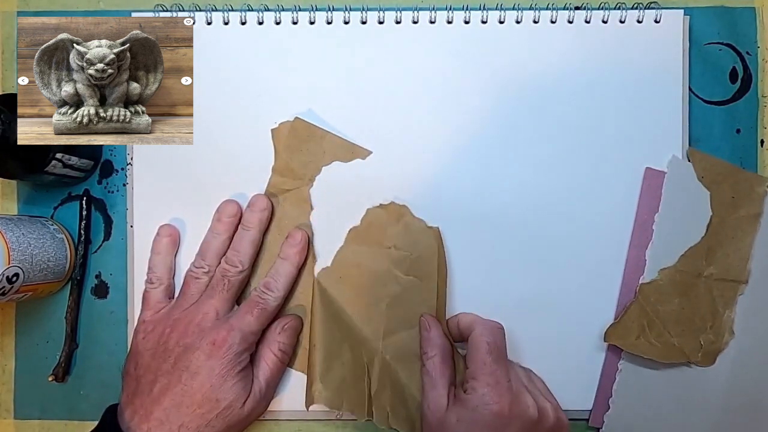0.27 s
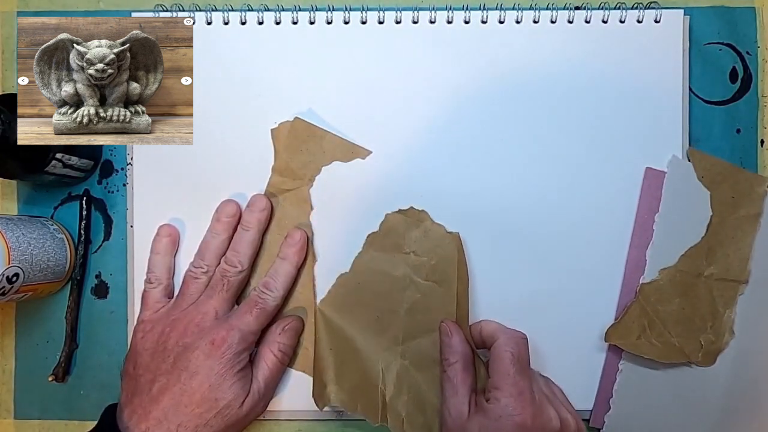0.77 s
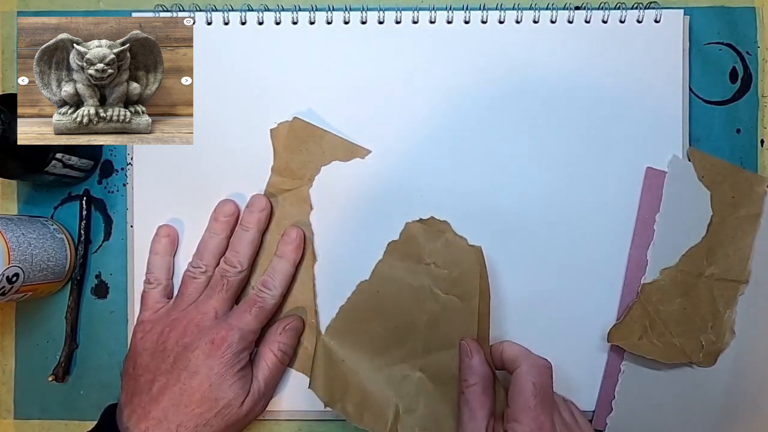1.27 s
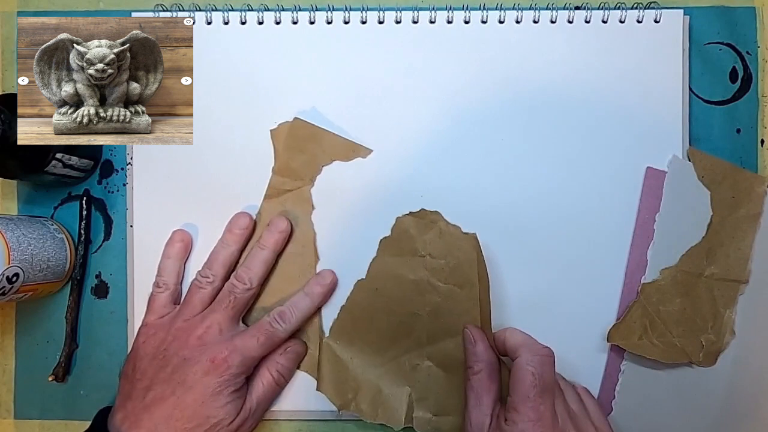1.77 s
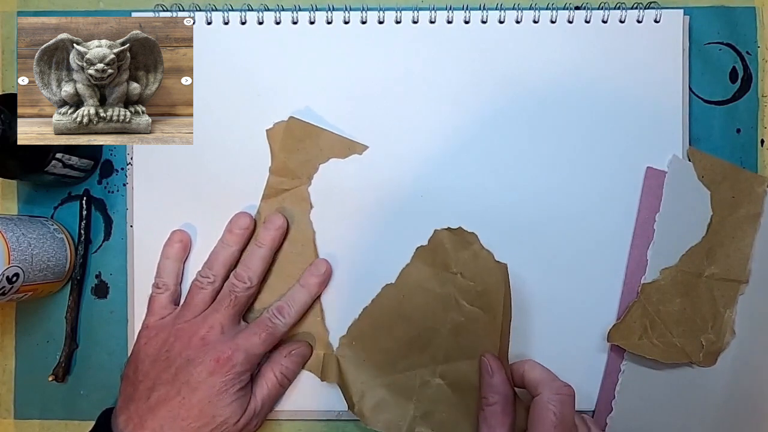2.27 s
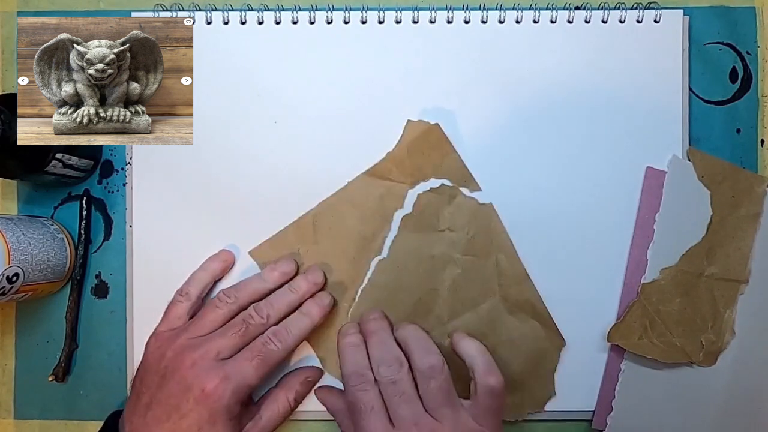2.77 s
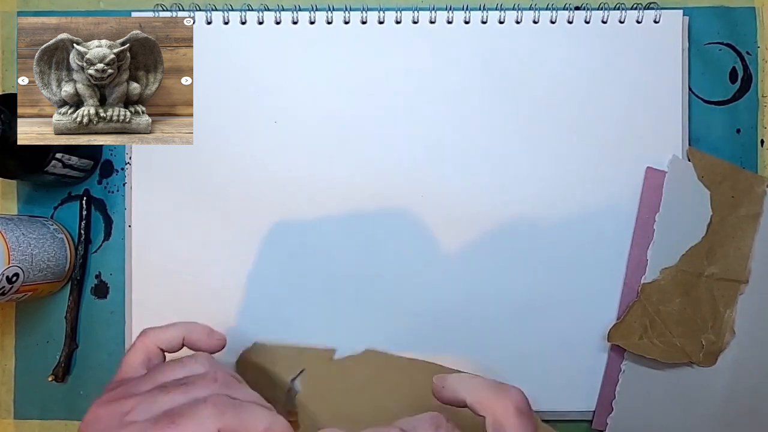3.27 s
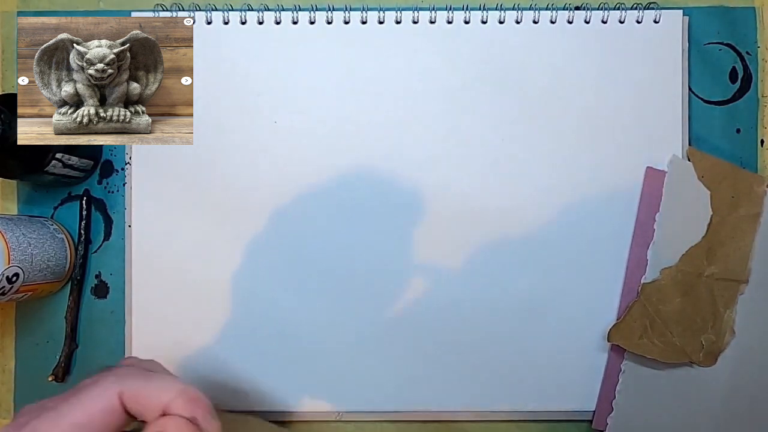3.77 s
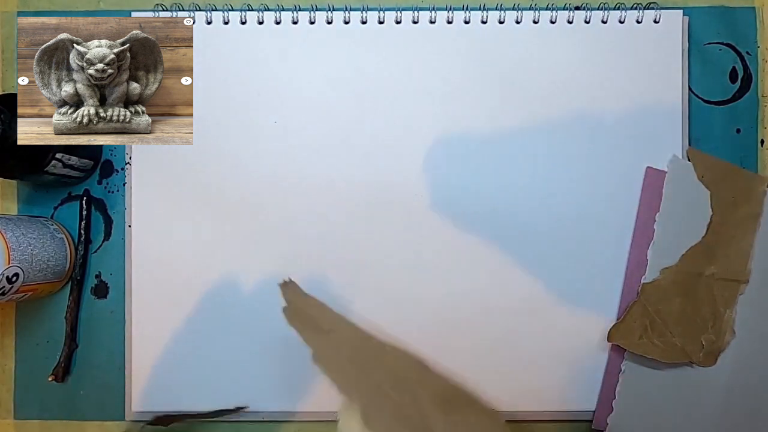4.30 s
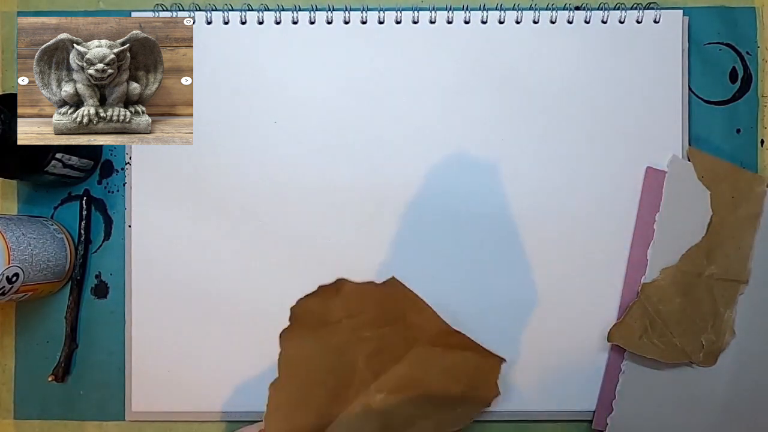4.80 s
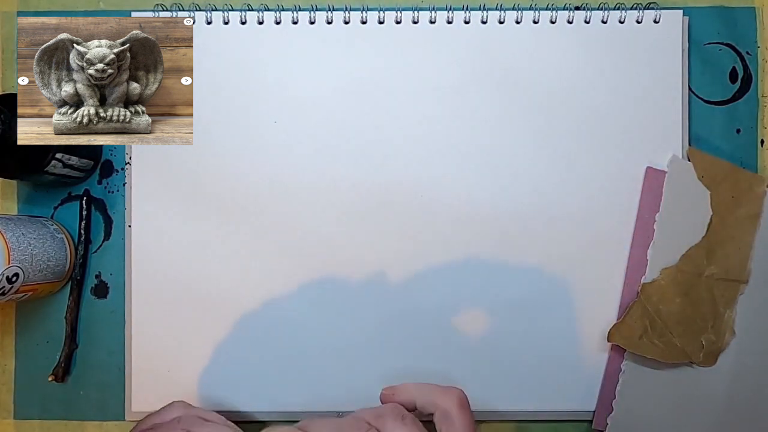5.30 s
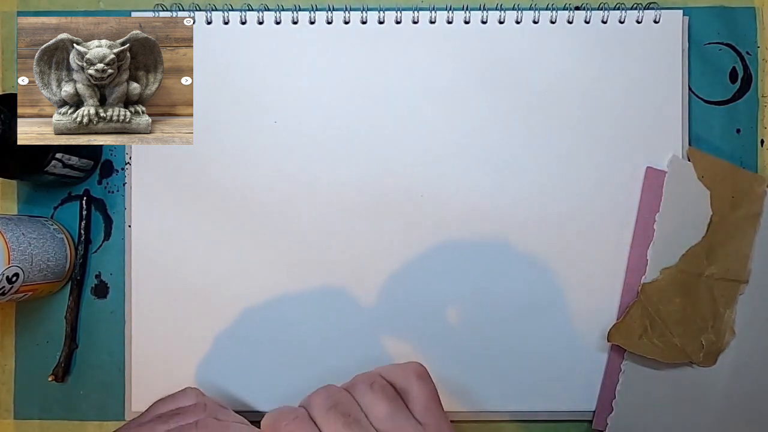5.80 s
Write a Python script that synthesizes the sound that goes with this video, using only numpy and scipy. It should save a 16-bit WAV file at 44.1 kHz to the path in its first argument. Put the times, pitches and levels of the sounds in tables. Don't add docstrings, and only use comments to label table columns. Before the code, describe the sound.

A close microphone in a small, fairly dry room picks up stiff brown paper handled on a worktable. From 0 to about 1.3 seconds it is torn in short irregular pulls, a gritty fizz of breaking fibres with bright snaps, strongest near 0.6 and 1.18. Smaller crease pops follow at 1.4 and around 1.9 to 2.1, then a near lull. Soft sliding swells at 2.5, with a crisp little crackle at 2.8. Between 3.05 and 3.35 the sheet gathers and crinkles, with dull finger taps. A hard, dense crumple bursts at 3.65 to 3.8, then fades into light rustling. A very sharp crack lands at 4.72, another bright pair at 4.87. Faint crinkles and a tap come near 5.13, quiet rubbing follows, and a final crisp crumple at 5.9. Low building rumble and faint hiss lie beneath, with soft table bumps.

```python
import sys
import numpy as np
from scipy import signal
from scipy.fft import rfft, irfft
from scipy.io import wavfile
from scipy.ndimage import uniform_filter1d

SR = 44100
rng = np.random.default_rng(int(sys.argv[2]) if len(sys.argv) > 2 else 0)


def to_linear_factor(level_db):
    exponent = np.asarray(level_db, float) / 20
    return 10 ** exponent


def bounce(signal):
    frames = np.transpose(np.atleast_2d(signal))
    limited = np.clip(frames, -1, 1)
    pcm = np.round(limited * 32767).astype(np.int16)
    wavfile.write(sys.argv[1], SR, pcm)


N = 266805


def evened(x):
    return x / np.sqrt(np.mean(x ** 2, axis=-1, keepdims=True) + 1e-20)


def read(points, hz):
    f, value = np.transpose(points)
    return np.interp(np.log(hz + 1), np.log(f + 1), value)


def causal(gain, size=2048):
    mirrored = np.r_[gain, gain[-2:0:-1]]
    log_gain = np.log(np.maximum(mirrored, 1e-5))
    return np.fft.ifft(np.exp(np.conj(signal.hilbert(log_gain)))).real[:size]


BAND_EDGES = (2000, 4300, 7600)
# f/Hz, level/dB
PAPER_COLOUR = [(90, -38.5), (200, -16), (500, -11), (1200, -11), (3000, -7.5), (4400, -6), (5500, -8),
                (6600, -8.5), (8500, -16.5), (12000, -32), (16000, -45.5)]


def paper_bands():
    hz = np.fft.rfftfreq(4096, 1 / SR)
    lowpasses = [1 / (1 + (hz / edge) ** 6) for edge in BAND_EDGES]
    shares = np.abs(np.diff([0 * hz] + lowpasses + [1 + 0 * hz], axis=0))
    colour = to_linear_factor(read(PAPER_COLOUR, hz))
    bands = np.array([causal(colour * np.sqrt(share)) for share in shares])
    return bands / np.linalg.norm(bands, axis=1, keepdims=True)


# t/s, hold/s, fizz level/dB, flex level above fizz/dB
SHARP_PULLS = [(0.0, 0.09497, -50, -8.5), (0.12, 0.084, -48, -12), (0.319, 0.12, -46.5, -8.5),
               (0.582, 0.055, -47, -7), (0.66, 0.092, -51.5, -5), (0.965, 0.11, -41.5, -8.5),
               (1.188, 0.088, -46, -8), (1.35, 0.025, -55, -10.5), (1.413, 0.02738, -51, -11),
               (1.55, 0.16, -61, -9.5), (1.872, 0.1309, -50, -10), (2.12, 0.025, -63, -14),
               (2.26, 0.11, -64, -12), (2.703, 0.064, -60, -16), (5.823, 0.023, -52.5, -6),
               (2.591, 0.0145, -59, -3), (3.483, 0.0081, -44, -10), (3.973, 0.00607, -52.5, -6),
               (4.271, 0.05208, -57, -13.5), (4.674, 0.042, -48, -7.5), (4.727, 0.01523, -41, -6.5),
               (4.869, 0.0089, -44.5, -10), (5.668, 0.043, -58.5, -7.5)]
PULL_RISE_S, PULL_FALL_S = 0.015, 0.064
PULL_BODY_DB, PULL_AIR_DB = -5.5, -5.5
# peak t/s, fizz level/dB, rise/s and fall/s for 20 dB, flex level above fizz/dB
SOFT_RUBS = [(0.55, -52.5, 0.051, 0.2759, -8.5), (1.1, -45, 0.0439, 0.12, -7),
             (1.746, -63, 0.101, 0.3447, -5.5), (2.4, -54.5, 0.17, 0.4, -11.5),
             (2.49, -47.5, 0.15, 0.13, -15), (2.815, -47.5, 0.11, 0.2, -9.5), (2.87, -64, 0.07, 1.5, -2),
             (2.99, -51, 0.16, 0.4, -18), (3.8, -46, 0.058, 0.17, -17.5), (3.91, -53, 0.12, 0.06, -17),
             (4.049, -60, 0.075, 0.2, -9), (4.145, -50, 0.06195, 0.08, -27.5),
             (4.39, -51.5, 0.15, 0.07, -17), (4.522, -58.5, 0.218, 0.3, -9.5), (4.84, -51, 0.2, 0.31, -8.5),
             (5.139, -53.5, 0.0498, 0.1176, -1.5), (5.33, -57.5, 0.14, 0.13, -3),
             (5.384, -54, 0.036, 0.1175, -17.5), (5.447, -56.5, 0.0418, 0.1473, -15),
             (5.6, -64.5, 0.11, 0.5, -25), (5.79, -60.5, 0.2226, 0.6, -5.5),
             (5.85, -47.5, 0.03, 0.1894, -10), (1.845, -63.5, 0.05, 0.25, 2.5)]
RUB_BODY_DB, RUB_AIR_DB = -8.5, -8
# full t/s, hold/s, fizz level/dB, rise/s for 20 dB (sign ignored),
# flex level above fizz/dB
AIR_SWELLS = [
    (3.07, 0.27, -48.5, -0.05, -10.5),
    (3.683, 0.081, -32, 0.09, -21),
    (4.941, 0.13, -54.5, 0.08, -19),
    (5.091, 0.17, -54.5, -0.3, -22.5),
    (5.896, 0.051, -36.5, 0.0033, -12),
]
SWELL_FALL_S, SWELL_BODY_DB, SWELL_AIR_DB = 0.038, -5, -7
REST_DB = -80.5
# t/s, level/dB
AIR_DRIFT = [(0, 0), (1.3, 2.5), (1.6, 2), (2.3, 6.5), (2.55, -2), (3.5, 1), (4.6, -0.5), (4.95, 0),
             (5.75, -4.5), (5.9, 5.5)]


def effort():
    t = np.arange(0, N / SR, 1 / 1000)
    strokes = [(s, hold, db, PULL_RISE_S, PULL_FALL_S, flex, PULL_BODY_DB, PULL_AIR_DB)
               for s, hold, db, flex in SHARP_PULLS]
    strokes += [(s, 0, db, rise, fall, flex, RUB_BODY_DB, RUB_AIR_DB)
                for s, db, rise, fall, flex in SOFT_RUBS]
    strokes += [(s, hold, db, rise, SWELL_FALL_S, flex, SWELL_BODY_DB, SWELL_AIR_DB)
                for s, hold, db, rise, flex in AIR_SWELLS]
    power = to_linear_factor(2 * (REST_DB + np.array([[-8], [RUB_BODY_DB], [0], [-6]]))) + 0 * t
    for s, hold, db, rise, fall, flex, body, air in strokes:
        rising_db = -20 * np.maximum(s - t, 0) / abs(rise)
        falling_db = -20 * np.maximum(t - s - abs(hold), 0) / abs(fall)
        level = db + rising_db + falling_db
        power += to_linear_factor(2 * (level + np.array([[flex], [body], [0], [air]])))
    power[-1] *= to_linear_factor(2 * np.interp(t, *np.transpose(AIR_DRIFT)))
    return t, 10 * np.log10(power)


def clicks(per_s, spread_db):
    breaks = rng.random(N) < per_s / SR
    size = to_linear_factor(spread_db * np.minimum(rng.exponential(1, N), 4)) * breaks
    spread = signal.lfilter([1], [1, -.9], size)
    return evened(spread * rng.standard_normal(N))


WHISPER_HZ, WHISPER_WIDTH_HZ, WHISPER_DB = 5350, 1000, -15


def rustle(bands, s, levels, tear_db=0.0, slide_db=-0.86, patchy_db=2.5, own=0.69):
    t = np.arange(N) / SR
    fizz_db = np.interp(t, s, levels[2])
    pull = np.clip((fizz_db + 56) / 12, 0, 1)
    lumps = uniform_filter1d(rng.standard_normal(N), size=120)
    lumps = evened(uniform_filter1d(lumps, size=120))
    clumps = to_linear_factor((slide_db + (tear_db - slide_db) * pull) * np.clip(lumps, -3, 2))
    shared, out = clicks(2000, 1.6), np.zeros(N)
    for band, db in zip(bands, levels):
        drive = evened(clumps * (shared + own * clicks(3000, 1.0)))
        out += signal.oaconvolve(drive * to_linear_factor(np.interp(t, s, db)), band)[:N]
    whisper = signal.filtfilt(*signal.iirpeak(WHISPER_HZ, WHISPER_HZ / WHISPER_WIDTH_HZ, fs=SR), drive)
    out += evened(whisper) * (1 - pull) * to_linear_factor(WHISPER_DB + fizz_db)
    z = signal.stft(out, nperseg=256)[2]
    patches = uniform_filter1d(rng.standard_normal(z.shape), size=4, axis=0)
    patches = uniform_filter1d(patches, size=4, axis=1)
    patch_gain = to_linear_factor(patchy_db * (patches / patches.std() - patchy_db / 9))
    return signal.istft(z * patch_gain, nperseg=256)[1][:N]


SLIPS_PER_S = 12
SLIP_DB, SLIP_SPREAD_DB, SLIP_FLEX_DB = -3, 8, -21.5


def slips(s, levels):
    when, size, bend = rng.random((round(SLIPS_PER_S * s[-1]), 3)).T
    when = when * s[-1]
    fizz_db = np.interp(when, s, levels[2]) + SLIP_DB - SLIP_SPREAD_DB * size
    return list(zip(when, fizz_db, SLIP_FLEX_DB + 16 * (bend - .5)))


# t/s, fizz
# level/dB, flex level above fizz/dB
FIBRE_SNAPS = [(0.025, -38.5, -17), (0.0551, -35, -18), (0.1185, -38, -14), (0.1286, -37, -12),
               (0.161, -38, -6), (0.213, -47, -5.5), (0.309, -34.5, -16), (0.3281, -33.5, -14.5),
               (0.353, -35, -14), (0.38, -35, -6.5), (0.3955, -35.5, -12), (0.432, -34, -9.5),
               (0.5409, -43.5, -10), (0.5721, -39, -7), (0.5902, -30, -8.5), (0.6224, -36, -7),
               (0.688, -38.5, -6), (0.7514, -41.5, -3), (0.7892, -48.5, 5), (0.9238, -48, -11.5),
               (0.9519, -38.5, -24), (1.0027, -38.5, -12), (1.0589, -39.5, -2), (1.112, -36.5, -10),
               (1.1385, -33, -12.5), (1.1764, -28.5, -7), (1.206, -42, -17), (1.2254, -38, -21),
               (1.246, -41, -19), (1.268, -44, -17),
               (0.075, -41, -19), (0.15, -39, -9), (0.1788, -42.5, -8), (0.2814, -54.5, -13.5),
               (0.3344, -35, -14), (0.4178, -40.5, -11), (0.489, -51.5, -20), (0.58, -38, -12),
               (0.734, -48, -13), (0.9181, -56, -16.5), (0.9582, -34, -5.5), (1.088, -56, -16),
               (1.171, -49, -16), (1.746, -53, -9.5), (1.897, -39.5, -11), (1.942, -39, -11),
               (2.9562, -52, -23.5), (3.5776, -47.5, -10), (2.249, -61.5, -24.5), (4.814, -52, -6),
               (5.199, -48, -12), (5.829, -53, -19.5), (5.8548, -54.5, -14), (5.878, -43, -25)]
# t/s, fizz level/dB, flex
# and body level above fizz/dB
CREASE_SNAPS = [(1.349, -48.5, -4.5, -1), (1.4177, -41, -8.5, 1.5), (1.4424, -46, -34.5, -8.5),
                (1.7286, -48.5, -7.5, -6.5), (1.751, -45.5, -6.5, -5), (1.873, -39, -6.5, -5.5),
                (1.9191, -34, -10.5, -6.5), (1.981, -48, -34.5, -9), (2.0088, -44, -15, -6),
                (2.1123, -45, -17, -6), (2.131, -53, -30, -17.5), (2.2762, -53.5, 3, 5),
                (2.489, -55, -41.5, -13.5), (2.514, -52, -30.5, -1), (2.5837, -55, -7, 6.5),
                (2.595, -36.5, -46, -10), (2.808, -41.5, -10, -18), (2.783, -49, -8, -11),
                (2.851, -45, -2, -4), (2.945, -49.5, -5, -3.5), (2.991, -59, -19.5, -4),
                (3.1257, -49.5, 6, -14), (3.1415, -35, -7, 3), (3.1955, -54.5, 5.5, 9.5),
                (3.2481, -41, -9, -18.5), (3.2865, -31.5, -12.5, 1), (3.3271, -59, -25, -11.5),
                (3.4817, -36.5, -31.5, -10), (3.603, -50, 0, -25),
                (3.6463, -44, -45, -10), (3.669, -39, -21, -15.5), (3.7494, -39.5, -8, 8),
              (3.7709, -40, -4, 7), (3.8297, -41, -18, -30), (3.9, -52.5, -26, -16),
              (3.9189, -49.5, -8, -22.5), (3.9749, -39, -7.5, -1.5), (4.0444, -55.5, -1, 8.5),
              (4.0647, -48.5, -15, -6), (4.2807, -37.5, -12, -14), (4.674, -49, -11.5, 4),
              (4.7212, -19.5, -17, -6), (4.7448, -32.5, -11.5, 2), (4.823, -45, -4, 4.5),
              (4.8687, -31, -12, -15.5), (4.876, -28.5, -15, -10), (4.9872, -45.5, -10.5, -14),
              (5.135, -42, 2, 7), (5.212, -51, 0, 7), (5.3292, -49.5, 0, 6.5), (5.4033, -37.5, -27.5, -9),
              (5.6729, -57, -13.5, 9), (5.701, -53, 1, 9.5), (5.7956, -49.5, -2.5, 3.5),
              (5.8464, -46.5, -2.5, 4), (5.888, -41, -32, -12)]
SNAP_MS = 5.5
SNAP_BODY_DB, BODY_PER_FLEX = 4, 0.64
AIR_PER_FLEX = 0.0012


def snaps(bands, s, levels, rise_ms=0.4481, air_db=-9, air_ms=7):
    fibres = FIBRE_SNAPS + slips(s, levels)
    events = CREASE_SNAPS
    events = events + [(*row, SNAP_BODY_DB + BODY_PER_FLEX * row[-1]) for row in fibres]
    t, out = np.arange(900) / SR, np.zeros(N + 3000)
    shape = (1 - np.exp(-t * 1000 / rise_ms)) * np.exp(-t * 1800 / SNAP_MS)
    noises = rng.standard_normal((len(events), 2, len(t)))
    for (at, fizz_db, flex_db, body_db), (noise, lumps) in zip(events, noises):
        flurry = noise * to_linear_factor(2.2 * evened(uniform_filter1d(lumps, size=24))) * shape
        flurry[4] -= np.clip((fizz_db + 52) / 4, 3.5, 9)
        parts = signal.fftconvolve(flurry[None], bands, axes=1)
        parts[-1] *= np.exp(-np.arange(parts.shape[1]) * 1000 / SR / air_ms)
        parts /= np.sqrt(np.mean(parts[:, :200] ** 2, axis=1, keepdims=True))
        drift_db = np.interp(at, *np.transpose(AIR_DRIFT))
        top_db = air_db + drift_db + AIR_PER_FLEX * (flex_db + 5.0)
        snap = to_linear_factor(fizz_db + np.array([flex_db, body_db, 0, top_db])) @ parts
        out[round(at * SR):][:len(snap)] += snap
    return out[:N]


# t/s, peak level/dB,
# f/Hz
BUCKLES = [(0.0765, -38, 5046), (0.0786, -38, 4800), (0.0824, -37, 5342), (0.1014, -38.5, 5050),
           (0.1197, -41, 5574), (0.1245, -30, 5665), (0.1519, -35.5, 6490), (0.165, -35, 2900),
           (0.1713, -34.5, 6390), (0.18, -35, 6488), (0.2137, -43, 5089), (0.2167, -41, 5510),
           (0.3094, -30, 5000), (0.3295, -27.5, 2770), (0.3755, -26, 5400), (0.3815, -30, 5230),
           (0.3853, -34, 4395), (0.396, -24, 5700), (0.4371, -29, 5643), (0.4419, -27.5, 5558),
           (0.4512, -32, 2989), (0.5948, -19.5, 4840), (0.5982, -32, 5209), (0.6166, -31, 5640),
           (0.6311, -33, 5436), (0.6532, -40, 4781), (0.6708, -32, 4666), (0.7316, -38, 5932),
           (0.7345, -39.5, 4308), (0.7592, -35, 5400), (0.9567, -27, 5852), (0.9636, -31, 5600),
           (0.9718, -36.5, 5620), (0.9771, -40, 4780), (1.0044, -41, 4537), (1.0235, -41.5, 4770),
           (1.0289, -37.5, 4648), (1.0305, -32, 6260), (1.0636, -30, 6062), (1.0709, -33, 6300),
           (1.088, -36, 6427), (1.103, -34, 6900), (1.1129, -29, 6200), (1.1178, -27, 7365),
           (1.1207, -34.5, 4763), (1.2075, -32, 5170), (1.2099, -33, 5000), (1.232, -32, 5580),
           (1.2433, -29, 7000), (1.248, -32, 5700), (1.2613, -42, 5693), (1.2707, -39, 3919),
           (1.8822, -33, 6500), (1.8994, -44, 5970), (1.927, -29, 5160), (1.944, -33, 5488),
           (1.9833, -40.5, 4853), (1.985, -39, 5419), (1.987, -38, 6798), (2.0102, -37, 5700),
           (2.787, -37, 4700), (2.7879, -35, 5008), (2.8095, -36, 5270), (2.812, -30.5, 4966),
               (2.8178, -20.5, 5800), (2.8209, -22.5, 4880), (2.8237, -21.5, 5000), (2.8252, -23, 5200),
               (2.8276, -29, 5230), (2.8353, -30, 5000), (2.848, -35, 5073), (3.6192, -34, 5587),
               (3.648, -30, 4200), (3.6522, -28, 5395), (3.6551, -25, 5500), (3.6647, -24, 4890),
               (3.6696, -27, 5117), (3.6729, -29, 5060), (3.677, -23.5, 3320), (3.681, -40, 5727),
               (3.683, -35, 6230), (3.6859, -35, 5720), (3.693, -26, 5470), (3.7001, -26.5, 6580),
               (3.7074, -16, 4904), (3.7161, -21, 5730), (3.7182, -23, 5930), (3.721, -16, 4500),
               (3.7241, -20, 4449), (3.73, -24, 4100), (3.732, -24, 6355), (3.7389, -24, 7100),
               (3.7421, -35.5, 5590), (3.75, -13, 3880), (3.757, -35, 4300), (3.753, -26, 4350),
               (3.7676, -28, 4709), (3.7727, -23, 3160), (3.7877, -34, 5560), (5.827, -35, 4800),
               (5.8305, -34, 5029), (5.8414, -33, 4802), (5.8476, -33.5, 5100), (5.8567, -33.5, 5171),
               (5.8775, -36, 5559), (5.8789, -33.5, 5760), (5.8965, -22.5, 5400), (5.9028, -19, 6600),
               (5.9062, -22, 5370), (5.9125, -26, 5266), (5.9142, -28, 6295), (5.9193, -27.5, 5489),
               (5.921, -24, 5569), (5.9295, -32, 5843), (5.9318, -36.5, 5736), (5.9391, -25, 5350),
               (5.9408, -23, 5420), (5.9438, -25, 6400), (5.9485, -24, 6340), (5.955, -22.5, 5430),
           (2.4417, -49, 5460), (2.462, -38, 5503), (2.4812, -35.5, 4805), (2.484, -40, 5602),
                  (2.4893, -40, 5573), (2.517, -30.5, 4500), (2.9266, -41, 5239), (2.956, -42, 5700),
                  (2.977, -38, 5033), (3.0703, -49, 5450), (3.133, -38, 5400), (3.1443, -24.5, 5400),
                  (3.181, -36, 5800), (3.186, -36, 5500), (3.1986, -27, 3728), (3.2445, -40, 6225),
                  (3.2515, -30.5, 6276), (3.2723, -29, 4700), (3.2909, -29, 2420), (3.296, -28, 5200),
                  (3.316, -37, 5350), (3.3196, -41.5, 5535), (3.324, -33, 5570), (3.3284, -46, 5416),
                  (3.3425, -42, 2982), (4.7593, -36, 5326), (4.7685, -34, 4926), (4.881, -41, 5706),
                  (4.8859, -41, 5140), (4.903, -32, 5850), (4.955, -40, 5160), (5.09, -41.5, 5450),
                  (5.1242, -40, 4997), (5.183, -40, 5472), (5.1848, -39, 5100), (5.199, -40, 5514)]
# t/s, peak level/dB, f/Hz
AFTER_BUCKLES = [
    (1.1772, -17.5, 4300),
    (1.1787, -15, 4930),
    (1.1795, -22, 4200),
    (5.138, -28.5, 3700),
    (2.114, -45, 5507),
    (2.134, -39, 5387),
    (4.7237, -18, 4980),
    (4.87, -27, 5300),
    (4.8767, -16, 7850),
    (4.878, -18, 7430),
]
POP_RISE_MS, POP_RING_MS, POP_DB = 0.37, 0.8, -5


def pops(bands, rough=0.4441, body=0.17, air=0.47):
    events = BUCKLES + AFTER_BUCKLES
    t, out = np.arange(160) / SR, np.zeros(N + 800)
    shape = (1 - np.exp(-t * 1000 / POP_RISE_MS)) ** 2 * np.exp(-t * 1000 / POP_RING_MS)
    lead = shape.argmax()
    wide = (body * bands[1] + bands[2] + air * bands[3])[:100]
    for (s, db, hz), noise in zip(events, rng.standard_normal((len(events), len(t)))):
        ring = np.sin(2 * np.pi * hz * t) + rough * np.convolve(noise, wide)[:len(t)]
        out[round(s * SR) - lead:][:len(t)] += to_linear_factor(db + POP_DB) * ring * shape / shape.max()
    return out[:N]


# t/s, peak level/dB, f/Hz, ring/ms
FINGER_TAPS = [(0.16, -36, 580.8, 4), (1.554, -46.5, 820, 1.9), (2.2757, -46, 854, 4.4),
               (3.094, -41, 852.5, 2.335), (3.128, -36, 1706, 4.3), (3.343, -36.5, 910, 2.4),
               (3.351, -44.5, 514, 5.6), (3.393, -47.5, 538.9, 2.845), (3.469, -35.5, 324, 3.9),
               (4.28, -40, 780, 2.565), (4.676, -40.5, 720, 4.1), (5.128, -40.5, 555.1, 1.7),
               (5.135, -30, 1080, 1.7), (5.1372, -29, 2414, 2.3), (5.211, -38, 409.3, 2.6),
               (5.326, -47, 447, 3.61)]


def taps(rise_ms=0.18):
    t, out = np.arange(1800) / SR, np.zeros(N + 1800)
    for s, db, hz, ring_ms in FINGER_TAPS:
        overtone = 0.63 * np.sin(2 * np.pi * 2.045 * hz * t) * np.exp(-t / 0.0075)
        ring = np.sin(2 * np.pi * hz * t) + overtone
        shape = (1 - np.exp(-t * 1000 / rise_ms)) * np.exp(-t * 1000 / ring_ms)
        out[round(s * SR):][:len(t)] += to_linear_factor(db) * ring * shape
    return out[:N]


# t/s, level/dB, length/ms, f/Hz
TABLE_BUMPS = [(0.019, -58, 45, 286), (0.113, -53, 18, 221.6), (0.639, -60, 11.97, 248),
               (1.03, -59, 57, 203), (1.721, -62.5, 21, 306.3), (0.66, -62.5, 22, 44.94),
               (1.73, -61, 33, 51), (2.701, -61.5, 20, 60), (3.749, -62, 7.66, 100),
               (4.675, -56, 18, 75.75), (5.193, -63, 27, 99.97), (5.32, -60, 15, 120),
               (5.682, -64.5, 21.87, 100.1), (5.929, -63.5, 31.86, 89.34)]


def bumps(spread=1.4):
    t, out = np.arange(8000) / SR, np.zeros(N + 8000)
    for (s, db, ms, hz), noise in zip(TABLE_BUMPS, rng.standard_normal((len(TABLE_BUMPS), len(t)))):
        u = t * 1000 / ms
        band = signal.butter(1, [hz / spread, hz * spread], "band", fs=SR, output="sos")
        wood = evened(signal.sosfiltfilt(band, noise))
        out[round(s * SR):][:len(t)] += to_linear_factor(db) * np.e * u * np.exp(-u) * wood
    return out[:N]


# t/s, strength/0-1
ECHO_STRENGTH = [(0, .55), (2.1, .55), (2.5, .15), (6.05, .15)]
TABLE_ECHO_MS = 1.19
# f/Hz, width/Hz, level/dB
STANDING_WAVES = [(121, 11, 5.5), (361, 79, -9), (436.4, 60, 9.5), (510, 35.52, -2.5), (596, 31, 3),
                  (658, 114, -9), (1280, 240, 1), (2017, 72, 3.5), (990, 320, -1.5), (5540, 780, 2.5)]


def table(x, dull_hz=3500):
    n = np.arange(N)
    strength = np.interp(n / SR, *np.transpose(ECHO_STRENGTH))
    dull = signal.lfilter(*signal.butter(1, dull_hz, fs=SR), x)
    wander = 1 + .025 * evened(uniform_filter1d(rng.standard_normal(N), size=3000))
    delay = wander * TABLE_ECHO_MS * SR / 1000 - 2
    echo = strength * np.interp(n - delay, n, dull, left=0)
    hz = np.fft.rfftfreq(4096, 1 / SR)
    standing_db = sum(db / (1 + (2 * (hz - centre_hz) / width) ** 2) for centre_hz, width, db in STANDING_WAVES)
    return signal.oaconvolve(x + echo, causal(to_linear_factor(standing_db)))[:N]


# f/Hz, t60/s
ROOM_DECAY = [(300, 0.17), (1300, 0.096), (4000, 0.074), (12000, 0.062)]
ROOM_DB = -10


def room(x):
    tail = np.zeros(SR // 2)
    at = np.arange(120, len(tail) - 12, 12)
    tail[at + rng.integers(0, 12, len(at))] = rng.choice([-1., 1.], len(at))
    hz, t, z = signal.stft(tail, SR, nperseg=128)
    decay = to_linear_factor(-60 * t / read(ROOM_DECAY, hz)[:, None])
    tail = signal.istft(z * decay, SR, nperseg=128)[1]
    return signal.fftconvolve(x, tail / np.linalg.norm(tail))[:N]


# f/Hz, level/dB
HUSH_COLOUR = [(8.8, -38), (15, 4), (65, -4), (303, -18.5), (382, -22), (917, -25.5), (1060, -31),
               (1260, -28), (5130, -33.5), (11600, -40), (16000, -43)]
# t/s, level/dB
RUMBLE_SWELL = [(0, 2), (1.2, -1.5), (1.5, 0), (2.5, -1.5), (2.9, 3.5), (4.4, 1.5), (5, 1), (6.05, -1)]
HUSH_DB = -63.5


def hush():
    hz = np.fft.rfftfreq(N, 1 / SR)
    swell_db = 1.5 * evened(uniform_filter1d(rng.standard_normal(N), size=6000))
    swell_db += np.interp(np.arange(N) / SR, *np.transpose(RUMBLE_SWELL))
    both = rfft(rng.standard_normal(N)) * to_linear_factor(read(HUSH_COLOUR, hz))
    rumble = irfft(both * (hz < 1000), N)
    hiss = irfft(both * (hz >= 1000), N)
    return to_linear_factor(HUSH_DB) * (to_linear_factor(swell_db) * rumble + hiss) / np.std(rumble + hiss)


def scene():
    bands = paper_bands()
    s, levels = effort()
    sheet = rustle(bands, s, levels) + snaps(bands, s, levels) + pops(bands)
    paper = table(sheet + taps() + bumps())
    return (paper + to_linear_factor(ROOM_DB) * room(paper) + hush())[None]


def low_pass(x):
    return signal.sosfilt(signal.butter(12, 16480, fs=SR, output="sos"), x)


def record(dry):
    limited = signal.oaconvolve(dry, signal.firwin(127, 16100, fs=SR)[None], "same")
    return low_pass(limited)


dry = scene()
out = record(dry)
bounce(out)
```